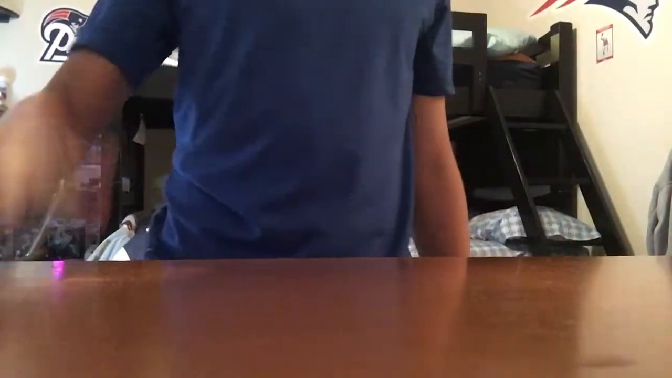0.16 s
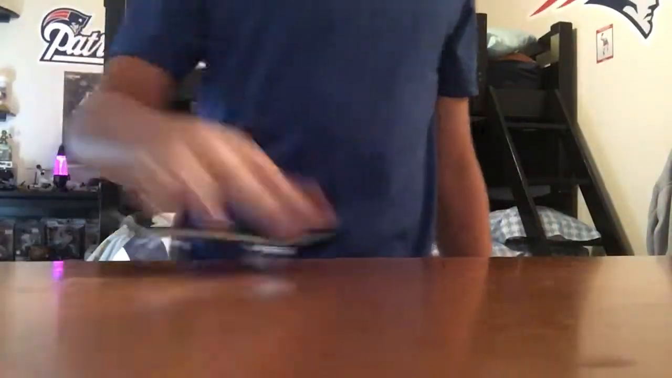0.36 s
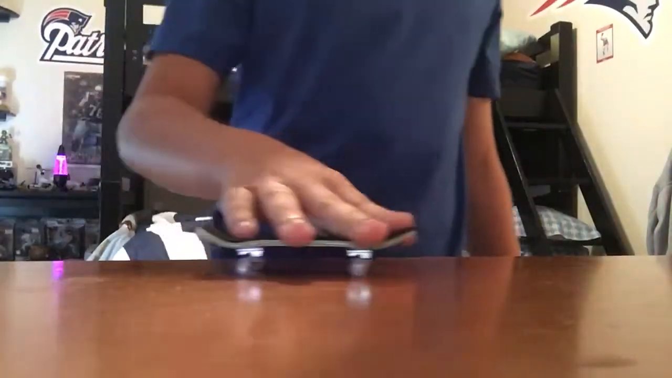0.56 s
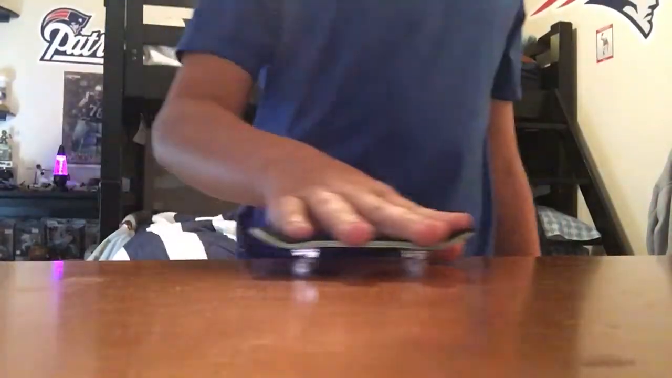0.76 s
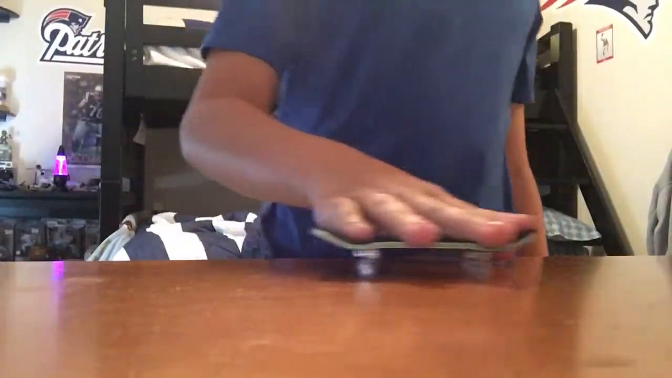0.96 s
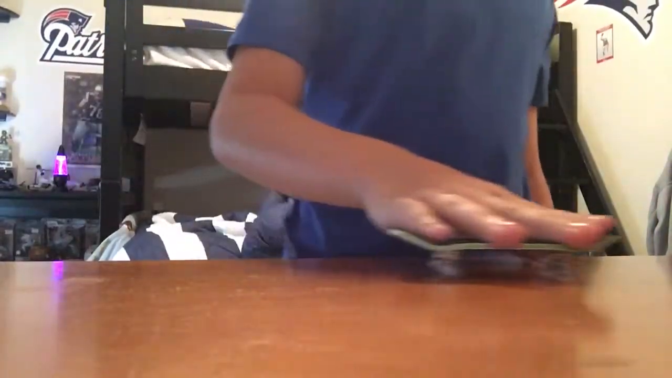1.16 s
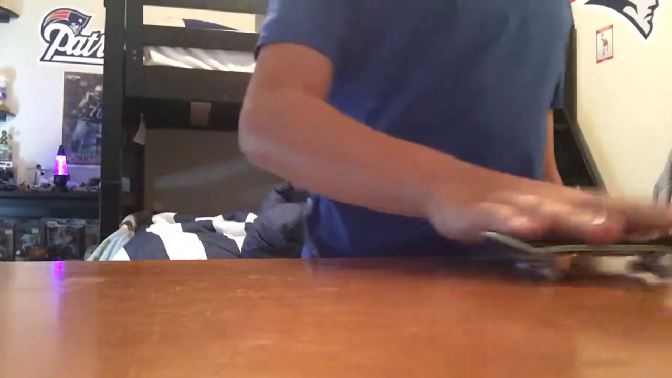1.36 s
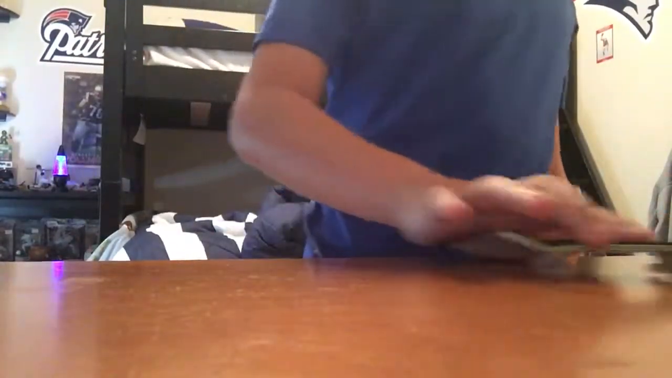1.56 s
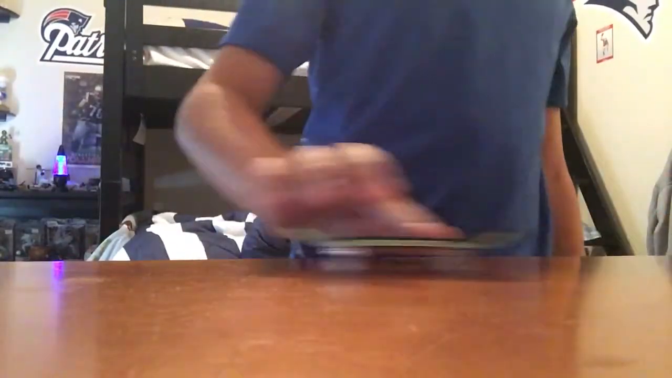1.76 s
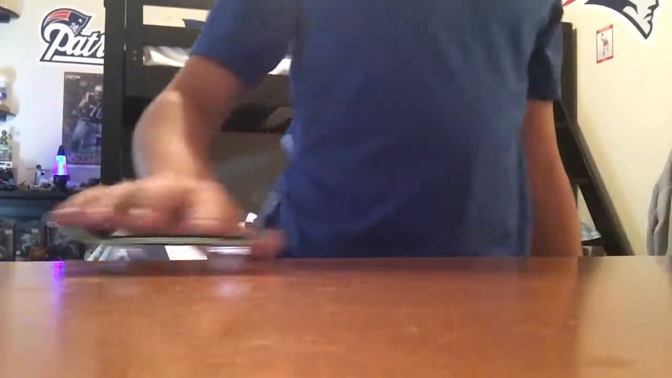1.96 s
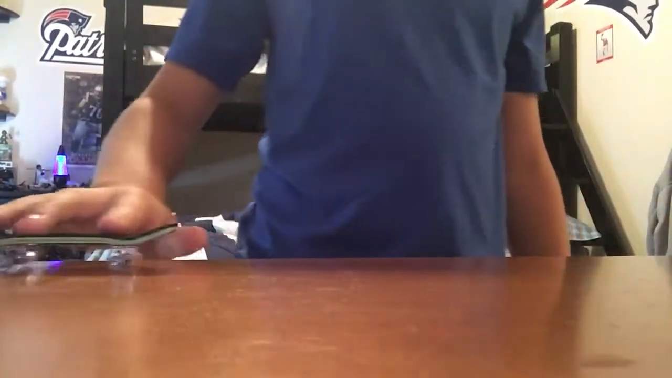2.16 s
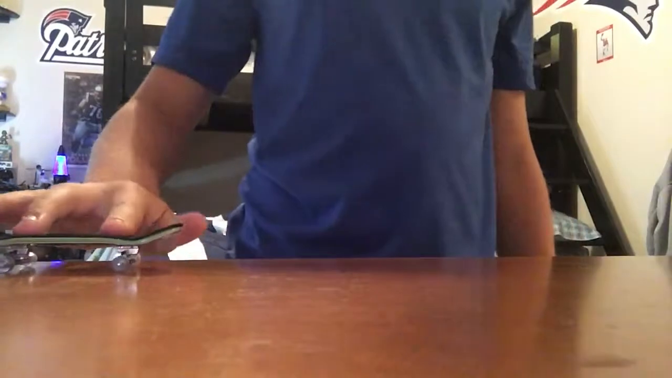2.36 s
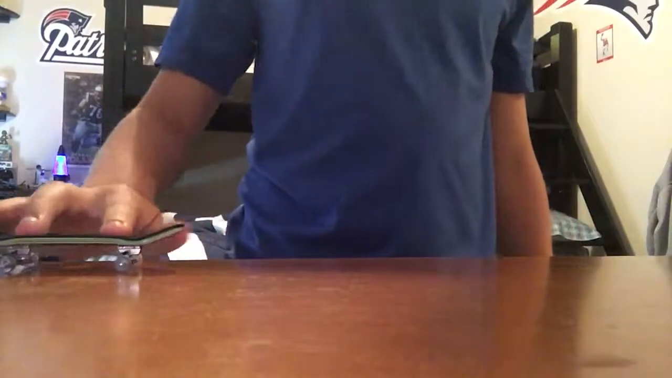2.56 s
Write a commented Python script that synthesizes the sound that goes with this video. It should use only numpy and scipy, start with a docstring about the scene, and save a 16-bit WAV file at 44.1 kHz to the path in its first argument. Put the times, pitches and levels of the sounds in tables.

```python
"""A fingerboard on a wooden desk in a small room. The tail scuffs and pops, the wheels whirr in the air,
and the board lands in a quick clatter. It rolls away, is tapped round, and rolls back harder, slowing
to a stop. Each blow rings the board and knocks the desk; the rolling is a stream of tiny jolts from
the wood grain, sounding through wheels, trucks and desk, with grit ticking underneath."""
import sys
import numpy as np
from scipy import signal
from scipy.io import wavfile

SR = 44100
rng = np.random.default_rng(int(sys.argv[2]) if len(sys.argv) > 2 else 0)


def digitize_waveform(pressure):
    """Quantize a signal to 16-bit integers and store it at the path in sys.argv[1].

    Rows of a 2-D input are taken as channels; values are limited to [-1, 1].
    """
    field = np.atleast_2d(pressure).T
    bounded = np.clip(field, -1, 1)
    quanta = np.round(bounded * 32767).astype(np.int16)
    wavfile.write(sys.argv[1], SR, quanta)


N = 114660
TIME = np.arange(N) / SR
IMPACT_BOOST_DB = 11  # on top of the table levels of blows and specks
FINGER_WAVER_HZ = 7  # how fast the fingers shift their weight


def amp(db):
    """Decibels to gain."""
    return 10 ** (np.asarray(db) / 20)

def unit_rms(x):
    """Scales to an rms of one."""
    return x / np.sqrt(np.mean(x ** 2) + 1e-20)

def unit_energy(x):
    """Scales to a total energy of one."""
    return x / np.linalg.norm(x)

def curve_at(points, hz):
    """Reads a curve on a log-frequency axis."""
    point_hz, value = np.transpose(points)
    return np.interp(np.log(hz + 1), np.log(point_hz + 1), value)

def fader(points, column=1):
    """Gain over time from a dB curve, silent outside it."""
    points = np.array(points)
    return amp(np.interp(TIME, points[:, 0], points[:, column], left=-200, right=-200))

def wander(hz):
    """Random drift at about the given rate."""
    return np.interp(TIME * hz * 2, np.arange(N), rng.standard_normal(N))

def add(mix, start_s, sound):
    """Mixes a sound in at a time."""
    part = mix[round(start_s * SR):][:len(sound)]
    part += sound[:len(part)]

def eq(x, points):
    """Minimum-phase filter of unit energy with the given spectrum."""
    log_gain = np.log(amp(curve_at(points, abs(np.fft.fftfreq(8192, 1 / SR)))))
    taps = np.fft.ifft(np.exp(np.conj(signal.hilbert(log_gain)))).real[:4096]
    return signal.fftconvolve(x, unit_energy(taps))[:len(x)]

def low_cut(x, hz, order):
    """Rolls off the bass."""
    return signal.sosfilt(signal.butter(order, hz, "high", fs=SR, output="sos"), x)

def resonate(x, hz, width_hz):
    """One resonance applied twice, for steep skirts."""
    b, a = signal.iirpeak(hz, hz / width_hz, SR)
    return unit_rms(signal.lfilter(b, a, signal.lfilter(b, a, x)))

def glide(x, hz, width_hz):
    """A steep resonance that follows a pitch curve."""
    carrier = np.exp(2j * np.pi * np.cumsum(hz) / SR)
    pole = np.exp(-np.pi * width_hz / SR)
    return unit_rms((carrier * signal.lfilter([1], [1, -2 * pole, pole * pole], x / carrier)).real)

def ring(modes, polarity=-1):
    """Struck modes dying away, with unit energy; polarity -1 flips every other mode."""
    t = TIME[:SR // 3]
    return unit_energy(sum(polarity ** k * amp(db - 60 * t / t60) * np.sin(2 * np.pi * hz * t)
                           for k, (hz, db, t60) in enumerate(modes)))

def jolts(per_s, spread_db, max_spreads):
    """Randomly timed impulses of uneven size."""
    size = amp(spread_db * np.minimum(rng.exponential(1, N), max_spreads))
    return size * rng.choice([-1, 1], N) * (rng.random(N) < per_s / SR)

def grain(spread_db=2.5, flutter_db=0.6):
    """Contact with the wood grain: dense tiny jolts, coming in clumps."""
    bumps = jolts(per_s=6000, spread_db=spread_db, max_spreads=4)
    return unit_rms(bumps * amp(flutter_db * wander(hz=69.67)))


# Room tone: freq_hz, gain_db
HUM_EQ = [(25, -16.5), (45, 2.5), (90, -4), (130, -6), (200, -3.5), (330, -14), (480, -18.5), (1500, -23),
          (3000, -25.5), (7000, -33.5), (16000, -47)]

def room_hum():
    """A quiet bed of bass-heavy noise."""
    return amp(-64) * unit_rms(eq(rng.standard_normal(N), HUM_EQ))

# Specks under a wheel: start_s, level_db
SPECKS = [(0.118, -54), (0.813, -45), (0.8485, -41), (0.929, -43), (1.067, -39), (1.120, -40), (1.360, -34),
          (1.42, -35.5), (1.489, -38), (1.508, -42), (2.347, -41), (2.378, -47.5)]
# Their bright snap: freq_hz, gain_db
SPECK_EQ = [(30, -45), (1000, -10), (2200, 6), (3400, 7), (5800, -3), (7000, -16), (13000, -13),
            (16000, -15)]

def specks(decay_s=0.0025):
    """Larger specks, each crushed in one brief tick."""
    out, t = np.zeros(N), TIME[:SR // 20]
    for start_s, level_db in SPECKS:
        crush = rng.standard_normal(len(t)) * np.exp(-t / decay_s)
        add(out, start_s, amp(level_db + IMPACT_BOOST_DB) * unit_energy(crush))
    return eq(out, SPECK_EQ)

# Rubs before the pop: start_s, length_s, level_db, pitch_hz
SCUFFS = [(0.174, 0.021, -44.5, 1510), (0.188, 0.046, -50, 1240), (0.211, 0.014, -36.5, 1490),
          (0.2212, 0.02, -22.5, 1280)]
# Their gritty edge: freq_hz, gain_db
SCUFF_EQ = [(30, -37.5), (300, -14.5), (600, 4.5), (1200, -4), (2100, -3.5), (3100, 1), (4500, -14.5),
            (6000, -13), (7500, -25.5), (16000, -30.5)]

def scuffs():
    """Tail and fingers rub in short swells, each with one gritty resonance."""
    out = np.zeros(N)
    for start_s, length_s, level_db, pitch_hz in SCUFFS:
        friction = grain()
        rub = resonate(friction, pitch_hz, width_hz=530) + amp(-6) * eq(friction, SCUFF_EQ)
        count = int(length_s * SR)
        add(out, start_s, amp(level_db) * unit_rms(rub[-count:] * np.hanning(count)))
    return out

# Hits on the desk: start_s, clack_db, knock_db, thump_db, ring_db, low_ring_hz, high_ring_hz, chatter_s
BLOWS = [(0.1872, -27.5, -48, -34, -21.5, 1660, 3260, 0.00051),
         (0.235, -17, -15, -24, -14.5, 2810, 5800, 0.0078), (0.2499, -2, -13.5, -5, 2, 3300, 3700, 0.0011),
         (0.4001, -4.5, -16, -15, 5, 2360, 4130, 0.00031),
         (0.4013, -27, -13.5, -5, -5.5, 1440, 2600, 0.001),
         (0.4149, -1.5, -6.5, -7.5, -12, 2730, 3500, 0.0012),
         (0.4157, 0.5, -23, -3, -8, 4130, 5080, 0.0013), (0.4249, -6, -12.5, -9, -18, 1950, 5950, 0.0023),
         (0.437, -1, -2.5, -4, -3, 2020, 3600, 0.0014), (0.4391, -5, -8, -3, -2, 1325, 3386, 0.0027),
         (0.4551, -2.5, -7, -7.5, -0.5, 3280, 3556, 0.0017),
         (0.509, -22, -19.5, -30, -19, 2900, 3250, 0.0028),
         (0.543, -43, -25.5, -46, -24, 1090, 2870, 0.0034),
         (1.0020, -58, -39.5, -35, -31, 1040, 1850, .002), (1.3680, -36, -35, -48, -34, 1180, 1500, 0.0067),
         (1.4463, -23, -26, -35, -25, 1410, 2680, 0.0028),
         (1.4557, -24.5, -25.5, -25, -18.5, 465, 2880, 0.0027),
         (1.5648, -32.5, -25.5, -20.5, -26.5, 577, 5680, 0.0029),
         (1.5785, -27, -19.5, -44, -21, 480, 3600, 0.0025), (1.585, -29, -51, -42, -25, 1180, 3060, 0.012),
         (2.008, -25.5, -52, -47, -24, 3270, 5750, 0.0013),
         (2.1531, -30.5, -27.5, -55, -34, 1480, 2940, 0.00091),
         (2.253, -45, -32.5, -53, -32.5, 1530, 2440, 0.0032),
         (2.2610, -49, -41, -60, -36, 1530, 2410, 0.0054), (2.2730, -52, -51, -67, -33, 1504, 2410, 0.0023),
         (2.2850, -42, -47, -58, -32.5, 1600, 3130, 0.0018),
         (2.5667, -39.5, -48, -59.5, -40, 947, 3450, 0.0019)]
# Tone of the clack: freq_hz, gain_db
CLACK_EQ = [(30, -51), (420, -35.5), (650, -13), (900, -8), (1400, -15), (1750, -6), (2400, 2.5),
            (2950, -2.5), (3400, 4.5), (4100, -3.5), (4900, -5.5), (5900, -6.5), (6800, -12.5), (8500, -12),
            (10000, -21.5), (16000, -19.5)]
# Woody modes of the desk top with the board on it: pitch_hz, level_db, t60_s
KNOCK_MODES = [(522, 0, 0.037), (651.3, 0, 0.077), (725, 2.5, 0.062), (767.7, 0.5, 0.042),
               (1022, -4, 0.027), (1206, -8, 0.078), (1425, -4.5, 0.041), (1600, -4.5, 0.059),
               (2188, -4, 0.036), (2612, -2.5, 0.043), (3180, -7, 0.11), (3520, -13, .07), (4180, -18, .08)]
# Bass modes of the desk: pitch_hz, level_db, t60_s
THUMP_MODES = [(80, -19.5, 0.24), (129, -12, 0.096), (155.8, 8.5, 0.034), (200, -6, 0.1), (255, 0, .03)]

def blows(ring_t60_s=0.012, attack_s=0.00065, thump_attack_s=0.0017, thump_lag_s=0.0013):
    """Each blow is a tick and a brief chatter of the trucks; the board rings, the desk knocks and thumps."""
    sharp, deep, t = np.zeros(N), np.zeros(N), TIME[:SR // 3]
    tick = t == 0
    attack = 1 - np.exp(-t / attack_s)
    knock = ring(KNOCK_MODES)
    thump = ring(THUMP_MODES, polarity=1) * (1 - np.exp(-t / thump_attack_s))
    for start_s, clack_db, knock_db, thump_db, ring_db, low_hz, high_hz, chatter_s in BLOWS:
        chatter = unit_energy(rng.standard_normal(len(t)) * np.exp(-t / chatter_s) * attack)
        clack = unit_energy(eq(tick + amp(3.5) * chatter, CLACK_EQ))
        board = attack * ring([(low_hz, 0, ring_t60_s), (high_hz, -1.5, ring_t60_s)])
        add(sharp, start_s, amp(clack_db) * clack + amp(ring_db) * board + amp(knock_db) * knock)
        add(deep, start_s + thump_lag_s, amp(thump_db) * thump)
    return amp(IMPACT_BOOST_DB) * (low_cut(sharp, hz=480, order=2) + deep)

# Whirr in the air: time_s, level_db
SPIN_FADER = [(0.245, -80), (0.26, -33.5), (0.29, -44.5), (0.34, -55), (0.39, -54.5), (0.41, -80.5)]
# Its thin tone: freq_hz, gain_db
SPIN_EQ = [(30, -38), (1000, -22.5), (2500, -12), (3500, -9), (4100, -12.5), (4550, 2), (5000, -7),
           (5900, -6), (7000, -14), (16000, -23)]

def free_spin():
    """The wheels spin freely while the board flies."""
    return eq(grain() * fader(SPIN_FADER), SPIN_EQ)

def deck_flex(start_s=0.2525, pitch_hz=393, t60_s=0.11):
    """The deck flexes and hums as it leaves the desk."""
    out = np.zeros(N)
    add(out, start_s, amp(-14) * ring([(pitch_hz, 0, t60_s)]))
    return out

# Low end of the roll: time_s, level_db
RUMBLE_FADER = [(0.45, -66), (0.7, -61), (0.82, -49.5), (0.9, -63), (0.99, -53), (1.78, -53), (2.05, -48),
                (2.16, -49.5), (2.25, -72)]
# Its weight: freq_hz, gain_db
RUMBLE_EQ = [(20, -35.5), (55, -9.5), (85, -2.5), (110, 1), (160, 1), (200, 2.5), (270, -9.5), (500, -16),
             (16000, -86)]

def desk_rumble():
    """The desk rumbles under the wheels."""
    return eq(grain() * fader(RUMBLE_FADER), RUMBLE_EQ)

# The light outward roll: time_s, level_db
AWAY_FADER = [(0.46, -37), (0.55, -51), (0.62, -62.5), (0.71, -53.5), (0.81, -52), (0.89, -53), (1.0, -51),
              (1.15, -49), (1.3, -49), (1.37, -46), (1.46, -82)]
# Its tone: freq_hz, gain_db
AWAY_EQ = [(30, -21.5), (200, -6.5), (420, -11.5), (800, -9.5), (1150, -0.5), (1600, -8), (2000, -3.5),
           (2600, -12.5), (3400, -9.5), (4600, -24), (5800, -22.5), (6800, -33), (9000, -30), (10000, -37),
           (16000, -38.5)]
# Wheel resonances at mid-push: pitch_hz, width_hz, level_db
WHEEL_RESONANCES = [(1110, 110, -4), (2060, 330, -8.5), (3600, 450, -15)]

def roll_away(mid_push_s=1.05, octaves_per_s=0.48):
    """The wheels run lightly over the grain, their resonances climbing as the board gathers speed."""
    level = fader(AWAY_FADER)
    roll = eq(grain(spread_db=4.5, flutter_db=3) * level, AWAY_EQ)
    climb = 2 ** (octaves_per_s * (TIME - mid_push_s))
    sing = sum(amp(db) * glide(grain(), hz * climb, width_hz) for hz, width_hz, db in WHEEL_RESONANCES)
    return roll + level * sing

# Modes of the rolling wheels, trucks and deck: pitch_hz, level_db, t60_s
TRUCK_MODES = [(1050, -3, .02), (1200, -9.5, .018), (1493, 1, .022), (1830, -3.5, 0.033), (2286, 0, .035),
               (3130, 3, 0.014), (3600, -10.5, 0.016), (4410, -5, .016), (5990, -9.5, 0.018)]

def truck_rings():
    """On both rolls, each mode swells and fades by itself as the fingers shift their weight."""
    out = np.zeros(N)
    for pitch_hz, level_db, t60_s in TRUCK_MODES:
        load = amp(level_db + 2.5 * np.tanh(wander(FINGER_WAVER_HZ)))
        out += signal.fftconvolve(grain() * load * np.sqrt(t60_s), ring([(pitch_hz, 0, t60_s)]))[:N]
    return unit_rms(out) * (amp(-17.5) * fader(AWAY_FADER) + amp(-6) * fader(BACK_FADER, column=2))

def desk_rings():
    """Jolts from both rolls keep the woody modes of the desk top ringing."""
    drive = grain() * (fader(AWAY_FADER) + fader(BACK_FADER))
    return amp(-16) * signal.fftconvolve(drive, ring(KNOCK_MODES))[:N]

# Crackle under the wheels: time_s, level_db
GRIT_FADER = [(0.5, -67), (0.85, -54), (0.88, -74), (1.25, -68), (1.38, -49), (1.5, -57.5), (1.55, -61),
              (1.65, -59), (1.77, -40), (1.95, -45.5), (2.15, -50.5), (2.3, -68), (2.45, -66)]
# Its bite: freq_hz, gain_db
GRIT_EQ = [(30, -47), (500, -11), (1400, 7.5), (2300, 2.5), (3200, 2), (4400, -5), (5100, -9), (5900, -2),
           (7500, -18), (11500, -16), (16000, -37)]

def grit():
    """Separate ticks where a wheel runs over a speck or rattles on its axle."""
    crackle = unit_rms(jolts(per_s=600, spread_db=3, max_spreads=3))
    return eq(crackle * fader(GRIT_FADER), GRIT_EQ)

# Pressed hard through the turn and the roll back: time_s, growl_db, rasp_db
BACK_FADER = [(1.1, -55, -87), (1.3, -54.5, -87), (1.37, -42, -57), (1.46, -43.5, -49.5),
              (1.55, -55, -62.5), (1.59, -37, -44), (1.64, -38, -46.5), (1.69, -34.5, -39.5),
              (1.76, -30, -31.5), (1.87, -36, -32), (1.95, -39.5, -33.5), (2.03, -51, -37),
              (2.12, -54.5, -44), (2.18, -47, -47), (2.24, -77, -65.5), (2.28, -63.5, -59),
              (2.32, -72, -70), (2.41, -68.5, -65.5), (2.48, -86, -94)]
# Body of the growl: freq_hz, gain_db
GROWL_EQ = [(30, -49), (150, -9.5), (260, -4), (350, 4), (470, 1.5), (620, 2), (880, -4), (1150, 2),
            (1480, -3), (1800, -12), (3000, -33.5), (16000, -67)]

def wheel_growl(sing_hz=1180, waver=0.056):
    """Loaded wheels growl; their lowest resonance sings out, wavering with the pressure of the fingers."""
    level = fader(BACK_FADER)
    growl = eq(grain(spread_db=3, flutter_db=2.4) * level, GROWL_EQ)
    sing = glide(grain(), sing_hz * (1 + waver * wander(FINGER_WAVER_HZ)), width_hz=430)
    return growl + amp(-7) * level * sing

# Bright edge of the roll back: freq_hz, gain_db
RASP_EQ = [(30, -57), (500, -12.5), (1400, -7.5), (1800, -2.5), (2300, -5.5), (2650, 1), (3150, 0.5),
           (3800, -4), (4100, -8.5), (4450, -8), (5150, -12), (5900, -13), (6700, -18), (11000, -28),
           (16000, -22.5)]

def wheel_rasp():
    """Hard-pressed wheels rasp over the grain in fast, uneven pulses."""
    pulses = unit_rms(grain(spread_db=4, flutter_db=2.2) * amp(2.5 * wander(hz=168.7)))
    return amp(-3) * eq(pulses * fader(BACK_FADER, column=2), RASP_EQ)

# Drone at the end of the roll: time_s, level_db
DRONE_FADER = [(1.85, -44.5), (2.18, -46.5), (2.24, -55), (2.29, -49.5), (2.34, -77), (2.42, -61),
               (2.48, -85.5)]

def wheel_drone():
    """The slowing wheels drone on one resonance."""
    return resonate(grain(), hz=691, width_hz=230) * fader(DRONE_FADER)

# Reverb decay: freq_hz, t60_s
ROOM_DECAY = [(100, 0.58), (500, 0.38), (2000, 0.25), (5000, 0.33), (14000, 0.35)]

def room(dry, reflections_per_s=2000, early_decay_s=0.016, tail_build_s=0.039):
    """Near reflections and the short tail of a furnished room."""
    count = SR // 2
    t = TIME[:count]
    hz, frame_s, spectrum = signal.stft(rng.standard_normal(count), SR, nperseg=256)
    decay = amp(-60 * frame_s / curve_at(ROOM_DECAY, hz)[:, None])
    tail = signal.istft(spectrum * decay, SR, nperseg=256)[1][:count]
    tail *= np.clip((t - 0.003) / tail_build_s, 0, 1)
    early = rng.standard_normal(count) * (rng.random(count) < reflections_per_s / SR)
    early *= np.exp(-t / early_decay_s) * (t > 0.002)
    response = amp(-21) * unit_energy(tail) + amp(-15) * unit_energy(early)
    return dry + signal.fftconvolve(dry, response)[:N]

def scene():
    """The board in the room, over a quiet hum."""
    board = specks() + scuffs() + blows() + free_spin() + deck_flex()
    board += desk_rumble() + roll_away() + truck_rings() + desk_rings() + grit()
    board += wheel_growl() + wheel_rasp() + wheel_drone()
    return (room(board) + room_hum())[None]

def record(dry):
    """The microphone cuts the deep bass, the loudest clacks soft-clip, and the top treble is cut."""
    thin = low_cut(dry, hz=70, order=3)
    squashed = thin / (1 + thin ** 4) ** 0.25
    high_cut = signal.firwin(255, 15850, window=("kaiser", 9), fs=SR)
    return signal.oaconvolve(squashed, high_cut[None], "same")


dry = scene()
out = record(dry)
digitize_waveform(out)
```